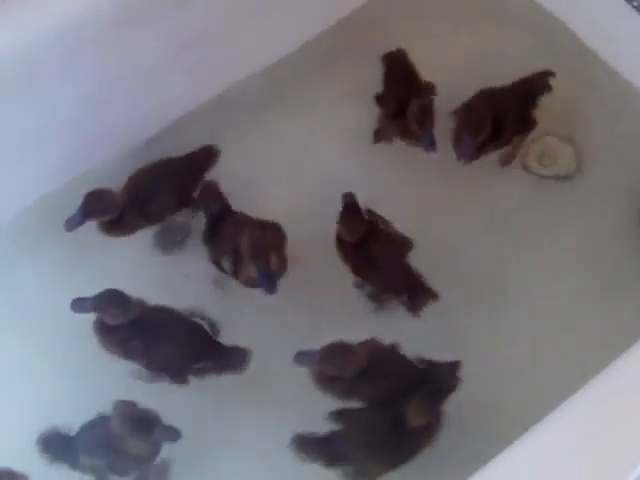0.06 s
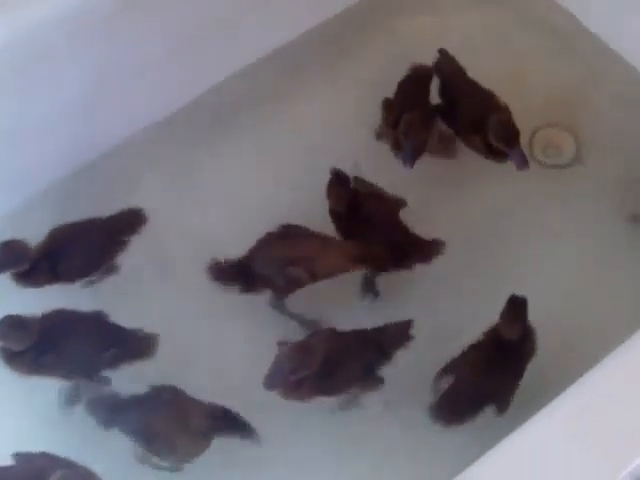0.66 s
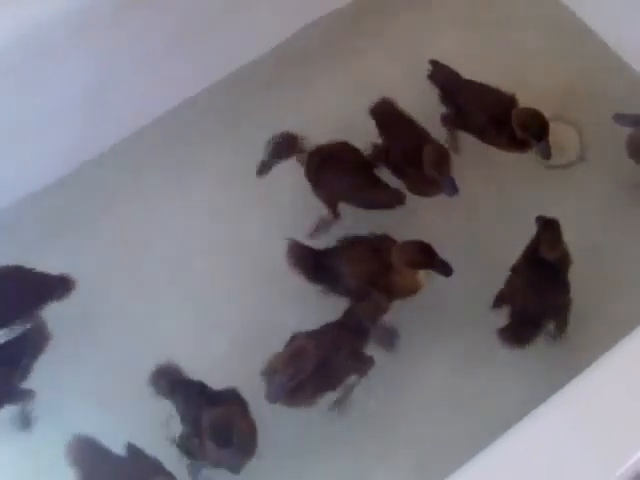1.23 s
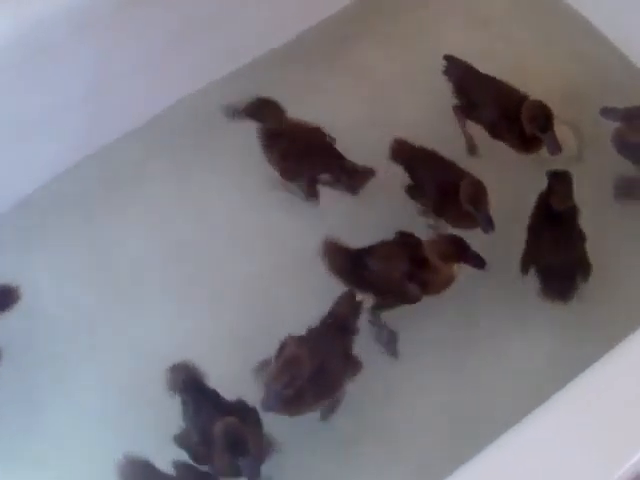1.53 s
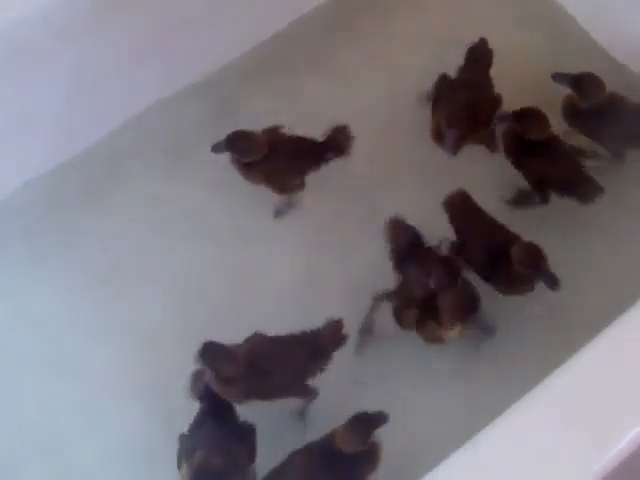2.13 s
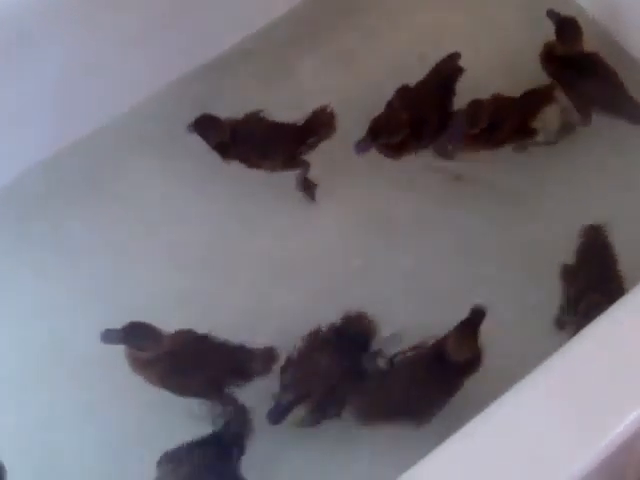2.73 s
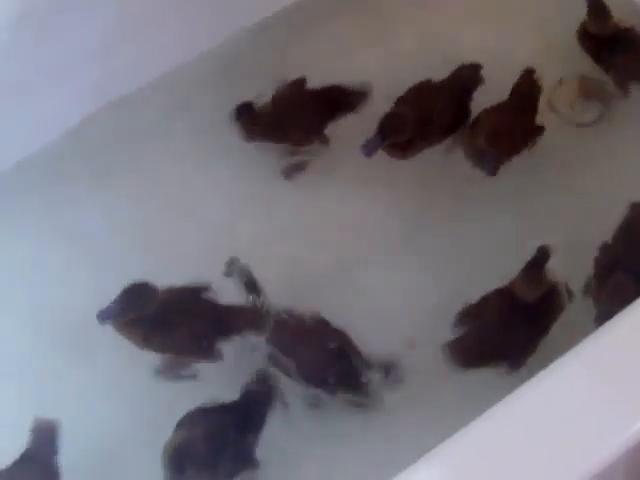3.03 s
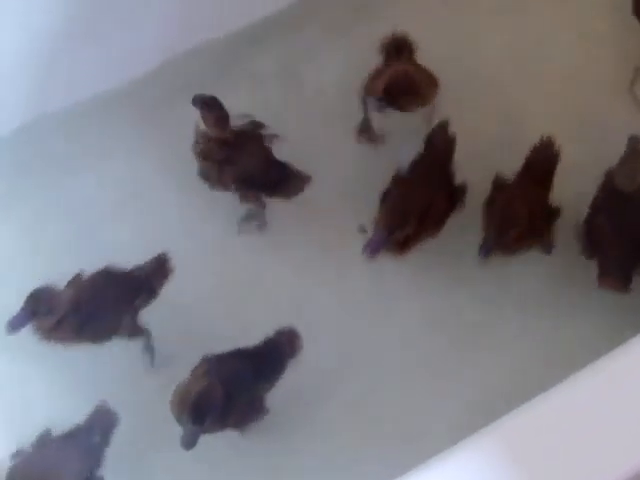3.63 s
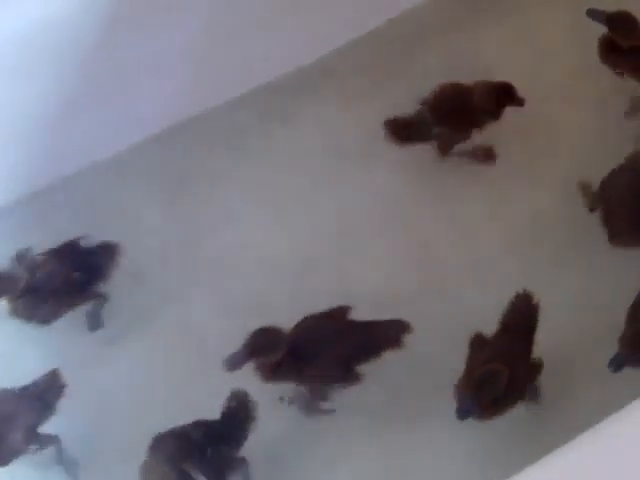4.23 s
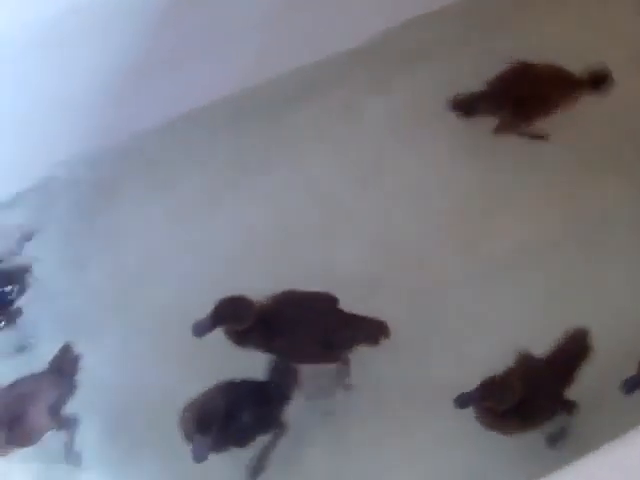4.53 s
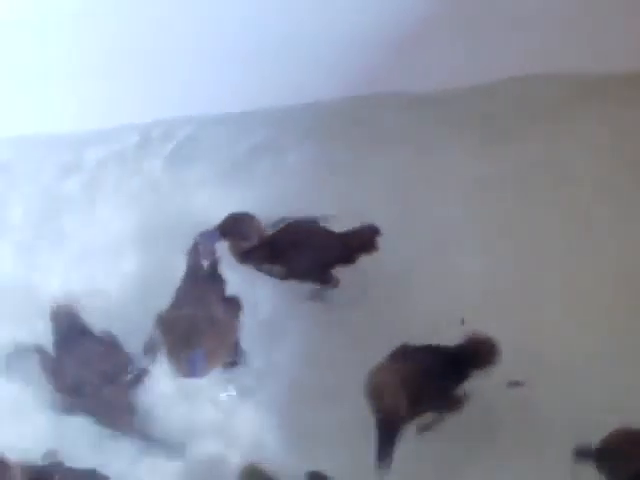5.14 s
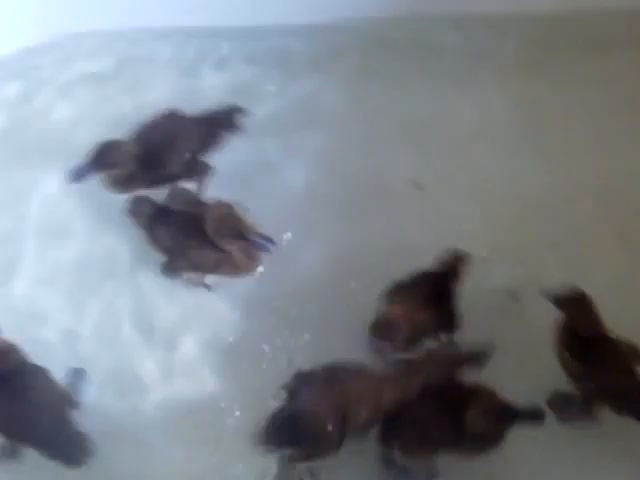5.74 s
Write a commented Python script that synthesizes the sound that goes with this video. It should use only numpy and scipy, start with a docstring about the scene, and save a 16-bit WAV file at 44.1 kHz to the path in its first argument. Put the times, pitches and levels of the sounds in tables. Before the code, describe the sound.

Ducklings peep softly while paddling in a bathtub, with small splashes and plops and one big splash at the end.

```python
"""Ducklings paddle and peep in a half-filled bathtub, heard from just above it.
A hollow gurgle dies away under the first soft peeps, whistles that arch as the bill opens and shuts.
From two to three seconds the water gets busy: feet and bills slap it, throw ticking spray and trap
bubbles that plop. More plops come near four seconds, then a run of louder peeps leads into one big
closing splash. Throughout, the surface laps and fizzes, and the hard tub and bathroom ring behind it."""
import sys
import numpy as np
from scipy import signal
from scipy.fft import rfft, irfft, next_fast_len
from scipy.io import wavfile
from scipy.ndimage import uniform_filter1d

SR = 44100
rng = np.random.default_rng(int(sys.argv[2]) if len(sys.argv) > 2 else 0)


def inscribe(sig):
    """Save sig as 16-bit PCM at rate SR to the path in sys.argv[1].

    A 1-D sig is mono; a 2-D sig holds one channel per row.
    Samples are clipped to [-1, 1] before scaling.
    """
    pcm = np.round(np.clip(np.atleast_2d(sig).T, -1, 1) * 32767)
    wavfile.write(sys.argv[1], SR, pcm.astype(np.int16))


N = 259308


def peeps(second_db=-12, third_db=-15, rasp_db=-8, jitter=0.081, arch=2.4, trim_db=-1):
    """A duckling's whistle arches in pitch as the bill opens and shuts, with a rasp on top."""
    # arched peeps (time [s], length [s], top pitch [Hz], level [dB], roughness [0-1])
    calls = [ (0.104, 0.051, 2587, -35, 0.56), (0.272, 0.051, 2475, -38, 0.42),
             (0.578, 0.04, 2300, -38, 0.5), (1.34, 0.054, 2410, -36.5, 0.39),
             (1.486, 0.045, 2730, -31, .22), (3.25, .02, 1513, -48, 0.1), (3.693, 0.045, 2502, -35, 0.3),
             (4.979, .068, 2347, -36, .14), (5.127, .061, 2809, -28, 0.23), (5.271, .052, 2514, -30, 0.48),
             (5.544, 0.048, 2525, -35, 0.7), (5.709, .06, 2980, -23.5, .4)]
    # thin sliding whistles (time [s], length [s], start pitch [Hz], end pitch [Hz], level [dB])
    whistles = [(1.86, .04, 1184, 2010, -52.5), (3.62, 0.079, 2600, 3080, -50),
                (3.846, 0.038, 3080, 2116, -36.5), (4.222, .095, 2700, 2370, -53),
                (4.395, .1, 2610, 3030, -46), (4.645, 0.044, 3190, 2050, -38)]
    # tone of the throat (frequency [Hz], gain [dB])
    throat = [(300, -60), (800, -6), (1400, 3.5), (3000, -3), (4000, -1), (5500, -11), (7200, 1),
              (8500, -1.5), (10000, -26), (14000, -16)]
    arched = [(s, length, 0.63 * hz, hz, 0.70 * hz, db, rough) for s, length, hz, db, rough in calls]
    # the thin whistles slide nearly straight and stay clean
    sliding = [(s, length, start, 1.0085 * (start + end) / 2, end, db, 0.14)
               for s, length, start, end, db in whistles]
    out = np.zeros(N)
    for s, length, start_hz, middle_hz, end_hz, db, rough in arched + sliding:
        progress = np.linspace(0, 1, int(length * SR))
        flutter = evened(uniform_filter1d(rng.standard_normal((2, SR // 4)), size=36))
        tremble, grit = flutter[:, :len(progress)]
        glide_hz = start_hz + (end_hz - start_hz) * progress
        bow_hz = (middle_hz - (start_hz + end_hz) / 2) * (1 - abs(2 * progress - 1) ** arch)
        phase = 2 * np.pi * np.cumsum((glide_hz + bow_hz) * (1 + jitter * rough * tremble)) / SR
        # overtones bloom mid-call; a hoarse call trades them for a rasp a fifth above the pitch
        overtones = gain_of(second_db) * np.sin(2 * phase) + gain_of(third_db) * np.sin(3 * phase)
        rasp = rough * gain_of(rasp_db) * grit
        edge = (1 - rough) * overtones + rasp * np.sin(1.5 * phase)
        voice = np.sin(phase) + np.sin(np.pi * progress) * edge
        effort = np.interp(progress, [0, .18, .5, .92, 1], [0, 1, .85, .9, 0]) * (1 + rasp)
        add(out, s, gain_of(db + trim_db) * topped(in_tub(effort * voice, walls_db=-4)))
    return coloured(out, throat)


def slaps(crack_db=-25, trim_db=-1):
    """Short-lived cavities in the water sound under a little crack: wide ones slap, narrow ones plink."""
    # slaps on the water and narrow, ringing bubble plinks
    # (time [s], level [dB], cavity pitch [Hz], nominal width [share of pitch], scatter [s])
    hits = [ (0.382, -41, 2150, 0.84, 0.023), (0.400, -37.5, 1660, 0.41, 0.014),
            (0.481, -43, 1300, 0.26, 0.004), (0.613, -34, 1960, 0.51, 0.0031),
            (0.776, -41, 2130, 0.21, 0.0035), (0.913, -38.5, 1340, 0.18, .025),
            (1.040, -47.5, 637, 0.53, 0.013), (1.119, -43.5, 3000, 0.25, .008),
            (1.261, -46, 2800, 0.78, 0.014), (1.330, -42.5, 970, 0.43, 0.003),
            (1.682, -43, 2680, 2.8, 0.0064), (1.762, -45, 1410, 0.18, 0.016),
            (1.959, -39.5, 2400, 0.37, 0.0025), (2.14, -40, 2630, .26, 0.014),
            (2.160, -43.5, 1320, 0.24, 0.0083), (2.203, -31.5, 2520, 0.37, 0.0044),
            (2.264, -34, 2520, 0.14, 0.0024), (2.339, -32.5, 2560, 0.6, 0.0034),
            (2.443, -29.5, 1860, 0.72, 0.013), (2.501, -30, 2710, 0.13, 0.0012),
            (2.558, -34.5, 830, 1.12, .009), (2.558, -35, 3330, 0.5, 0.0027),
            (2.647, -32.5, 2820, 0.24, 0.008), (2.695, -41, 3600, 0.15, 0.0046),
            (2.861, -31.5, 1450, 0.37, 0.015), (2.89, -32.5, 1010, 0.74, 0.034),
            (2.901, -32, 1730, 0.31, 0.014), (3.008, -32, 2525, 0.083, .006),
            (3.064, -40, 2280, 0.055, 0.0039), (3.285, -47.5, 1100, 0.39, 0.024),
            (3.535, -49, 620, 2.25, 0.069), (3.929, -42, 1830, 0.45, 0.02),
            (3.972, -33.5, 1310, 0.9, 0.017), (4.052, -39.5, 2200, 0.11, 0.0076),
            (4.34, -36.5, 3510, 0.19, 0.019), (4.409, -37.5, 2100, 0.43, 0.017),
            (4.495, -39, 1350, 0.28, 0.015), (4.772, -37.5, 2430, 1.6, 0.0055),
            (5.458, -34.5, 1340, 0.44, 0.0072), (5.814, -31, 1200, .8, 0.015),
            (5.826, -24, 1880, 1.2, 0.024), (5.842, -27.5, 816, 0.45, 0.0093),
            (5.859, -28.5, 1610, 0.22, 0.0082)]
    out = np.zeros(N)
    for s, db, hz, share, scatter_s in hits:
        hit = resonate(burst(scatter_s, first=0.14, per_s=4000), hz, share * 0.94)
        cavity = resonate(hit, hz, share * 1.9, share * 3)
        sound = in_tub(cavity + gain_of(crack_db) * hit, walls_db=-8)
        add(out, s, gain_of(db + trim_db) * topped(sound))
    return out


def spray(fizz, scatter_s=0.0033, plink_count=5, plink_db=1, trim_db=-1, lowpass_hz=12500):
    """Flung drops tick on the surface and leave a few pinhead bubbles that plink."""
    # featured drops landing (time [s], level [dB], centre [Hz], nominal width [share of centre])
    landings = [ (0.027, -43, 6200, 0.19), (0.247, -33, 5200, 0.62), (0.450, -33.5, 5120, 0.87),
                (0.523, -38, 4460, 0.27), (0.612, -35, 6800, 0.19), (0.648, -38.5, 4970, 0.41),
                (0.924, -35.5, 9500, 1), (0.958, -34.5, 10800, 0.65), (1.017, -40, 4700, 0.29),
                (1.394, -40, 10400, .9), (1.568, -40.5, 4310, 0.51), (1.622, -45, 6430, .8),
                (1.664, -41.5, 9020, .35), (2.143, -33, 7100, 0.22), (2.223, -35, 9100, 0.94),
                (2.247, -36.5, 4270, 0.34), (2.322, -31, 8460, 0.52), (2.460, -28.5, 9740, 0.26),
                (2.478, -37, 10700, 0.66), (2.569, -32.5, 7500, 0.37), (2.751, -34, 3800, 0.27),
                (2.781, -41.5, 5770, 0.23), (2.851, -35.5, 13600, 1), (2.892, -25.5, 8430, 0.86),
                (3.011, -28.5, 5670, 1), (3.015, -26.5, 4370, 0.18), (3.016, -24, 10100, 0.94),
                (3.337, -45, 5760, 0.23), (3.425, -48, 12500, 0.83), (3.871, -36, 4060, 0.99),
                (3.898, -39, 7700, .6), (4.079, -36.5, 11000, 0.79), (4.300, -43, 3920, 0.78),
                (4.341, -33.5, 5300, 0.87), (4.697, -29, 6680, 0.31), (4.768, -38, 6000, .7),
                (4.812, -40, 5860, 0.28), (5.238, -36, 11300, 0.41), (5.389, -35, 5470, 0.35),
                (5.463, -43.5, 5700, 0.67), (5.827, -25.5, 4130, 0.64)]
    out = np.zeros(N)
    for s, db, hz, share in list(landings) + stray_drops(fizz):
        tick = resonate(burst(scatter_s, first=0.11, per_s=2700), hz, share, share * 3)
        pitches = np.clip(hz * np.exp(0.64 * share * rng.standard_normal(plink_count)), 2500, 14000)
        plinks = sum(resonate(burst(scatter_s, first=0.83, per_s=810), f, 0.068, 1.0) for f in pitches)
        splash = evened(tick) + gain_of(plink_db) * evened(plinks)
        add(out, s, gain_of(db + trim_db) * topped(in_tub(splash, walls_db=-7)))
    return signal.sosfilt(signal.butter(2, lowpass_hz, fs=SR, output="sos"), out)


def stray_drops(fizz, count=50, low_hz=3570, high_hz=11600, lift_db=10, spread_db=4, share=0.506):
    """Cues for small drops at random moments and pitches, stronger while the water fizzes."""
    when, pitch, size = rng.random((count, 3)).T
    times = (np.arange(count) + when) / count * (N - 1) / SR
    levels = 20 * np.log10(fizz[(times * SR).astype(int)]) + lift_db + spread_db * (2 * size - 1)
    pitches = low_hz * (high_hz / low_hz) ** pitch
    return [(s, db, hz, share) for s, db, hz in zip(times, levels, pitches)]


def bubbles(chirp=0.19, trim_db=-1):
    """A bubble rings as it pinches off, and sharpens slightly on its way up."""
    # plops of trapped air (time [s], level [dB], pitch [Hz], attack [s], 60 dB decay [s])
    plops = [ (0.672, -35, 987, 0.001, 0.2), (0.716, -47, 3280, 0.0014, 0.045),
             (0.914, -41, 1276, 0.0016, 0.064), (0.926, -45.5, 3010, .001, 0.059),
             (1.208, -48.5, 2800, .002, .04), (1.783, -44, 5540, 0.00069, .023),
             (1.957, -43, 2080, .0006, 0.047), (2.262, -54.5, 362, 0.0058, 0.055),
             (2.567, -27.5, 686.5, 0.03, 0.041), (2.646, -36, 513, 0.0038, 0.041),
             (2.8905, -35.5, 514.6, .002, 0.14), (2.892, -33, 567, 0.0013, 0.1),
             (2.9, -34, 1020, .0037, 0.071), (3.211, -46, 3360, .001, 0.017),
             (3.257, -49, 3255, .002, 0.094), (3.901, -37, 1071, 0.0024, 0.31),
             (3.972, -26.5, 1078, 0.002, 0.074), (3.991, -32.5, 1076, .0028, 0.097),
             (4.195, -46, 1746, 0.0048, 0.058), (4.301, -40.5, 1410, 0.0011, 0.028),
             (4.754, -40.5, 977, 0.0008, 0.19), (4.769, -38, 975, 0.0049, 0.12),
             (5.812, -24, 900, 0.0026, 0.0099), (5.814, -23.5, 1657, 0.0015, 0.031),
             (5.828, -47, 546, 0.0045, .19), (5.839, -26.5, 872, 0.0023, 0.042)]
    out, t = np.zeros(N), np.arange(SR // 4) / SR
    for s, db, hz, attack_s, t60 in plops:
        envelope = (1 - np.exp(-(t / attack_s) ** 2)) * gain_of(-60 * t / t60)
        tone = np.sin(2 * np.pi * hz * t * (1 + chirp * t))
        add(out, s, gain_of(db + trim_db) * topped(envelope * tone))
    return out


def paddling(attack_s=0.0082, release_s=0.046, calm_lapping_db=-57.5, calm_fizz_db=-64.5):
    """Envelopes for lapping and fizz: each bout swells, holds and settles over the flock's bustle."""
    # bouts of paddling (time [s], length [s], lapping [dB], fizz [dB])
    strokes = [ (0.0, 0.021, -50.5, -59), (0.38, 0.16, -52.5, -54.5), (0.536, 0.13, -47.5, -55),
               (0.885, 0.16, -54.5, -54), (1.244, .13, -49, -62.5), (1.624, 0.14, -54, -58),
               (1.859, 0.096, -57, -54.5), (2.156, 0.13, -51, -54.5), (2.353, 0.18, -51, -47.5),
               (2.55, 0.2, -45.5, -54.5), (2.834, 0.074, -43.5, -54), (2.996, 0.032, -41, -41.5),
               (3.2, 0.068, -60.5, -55.5), (3.897, 0.11, -41.5, -48), (4.059, 0.053, -40, -49.5),
               (4.417, 0.076, -66, -53), (4.703, 0.17, -47, -59.5), (5.198, 0.17, -51, -56),
               (5.455, 0.23, -53, -59), (5.75, 0.15, -70, -50), (5.801, 0.023, -30, -34.5)]
    # how busy the flock keeps the surface between bouts (time [s], gain [dB])
    bustle = [(0, 2.5), (1.75, 0.5), (2.05, -2.5), (2.3, 5.5), (3.0, -3), (3.42, -4), (4.15, 1.5),
              (5.88, -1.5)]
    t = np.arange(N) / SR
    activity = gain_of(np.interp(t, *np.transpose(bustle)))
    power = np.outer(gain_of([calm_lapping_db, calm_fizz_db]), activity) ** 2
    for s, length, lapping_db, fizz_db in strokes:
        attack = np.clip((t - s) / attack_s, 0, 1)
        release = np.exp(-np.maximum(t - s - length, 0) / release_s)
        power += np.outer(gain_of([lapping_db, fizz_db]), attack * release) ** 2
    return np.sqrt(power)


def churn(lapping, fizz, lapping_db=-3, fizz_db=-2):
    """Paddling stirs up two beds of bubbles: a midrange lapping and a bright fizz."""
    # tone of each bed (frequency [Hz], gain [dB])
    lapping_eq = [(300, -41), (600, -6), (1100, 4), (2400, 3.5), (3600, -3), (6000, -28), (12000, -31)]
    fizz_eq = [(1500, -21), (3500, 1.5), (6000, 1), (8500, -0.5), (10500, 1.5), (12500, -3.5), (16000, -7)]
    low = coloured(bubble_bed(571.8, 4138, per_s=650, share=0.032, spread_db=1), lapping_eq)
    high = coloured(bubble_bed(3163, 14340, per_s=1000, share=0.031, spread_db=4), fizz_eq)
    return gain_of(lapping_db) * lapping * evened(low) + gain_of(fizz_db) * fizz * evened(high)


def bubble_bed(low_hz, high_hz, per_s, share, spread_db, sizes=28):
    """A crowd of tiny bubbles, each size swelling and ringing at its own random moments."""
    pitches = np.geomspace(low_hz, high_hz, sizes) * rng.uniform(.97, 1.03, sizes)
    pops = (resonate(patter(N, per_s / sizes, spread_db), hz, share, 4 * share) for hz in pitches)
    return sum(evened(pop) * np.sqrt(hz) for pop, hz in zip(pops, pitches))


def gurgle(start_db=-50, fade_db_per_s=18.5, body_hz=205, body_db=-21):
    """Stirred water sounds a few low, hollow resonances over a dull body, all fading steadily."""
    # hollow resonances (pitch [Hz], nominal width [Hz], gain [dB])
    modes = [(644, 9.6, 1), (677, 18, -2.5), (770, 104, -2.5), (946, 45, -8)]
    stir = rng.standard_normal(N)
    hollow = sum(gain_of(db) * resonate(stir, hz, 2 * width / hz, 2 * width / hz)
                 for hz, width, db in modes)
    body = gain_of(body_db) * evened(resonate(stir, body_hz, 0.79, 0.79))
    return (evened(hollow) + body) * gain_of(start_db - fade_db_per_s * np.arange(N) / SR)


def wash(lapping, steady_db=-63.5, slosh_db=-14, lag_s=0.45):
    """A low wash of water swells after each bout of paddling."""
    # hollow tone of the wash (frequency [Hz], gain [dB])
    wash_eq = [(100, -28), (200, -13), (400, -2.5), (600, 1), (730, 3), (950, -2), (1600, -3), (4000, -50)]
    pole = np.exp(-1 / (lag_s * SR))
    slosh = gain_of(slosh_db) * signal.lfilter([1 - pole], [1, -pole], lapping)
    return evened(coloured(rng.standard_normal(N), wash_eq)) * np.hypot(gain_of(steady_db), slosh)


def room_tone(level_db=-62):
    """The still air of the room, a faint steady hiss."""
    # tone of the air (frequency [Hz], gain [dB])
    air_eq = [(30, -27), (80, -15), (125, -11.5), (170, -6.5), (500, -10.5), (1500, -3.5), (3000, -8.5),
              (5500, -10), (10500, -10), (15500, -6.5)]
    return gain_of(level_db) * evened(coloured(rng.standard_normal(N), air_eq))


def in_tub(x, walls_db, count=12):
    """Adds quick echoes from the tub walls, which differ with every place on the water."""
    echoes = np.zeros(SR // 40)
    echoes[rng.integers(SR // 600, len(echoes), count)] = rng.choice([-1, 1], count) / np.sqrt(count)
    echoes *= gain_of(walls_db) * np.linspace(2, .5, len(echoes))
    echoes[0] = 1  # the direct sound
    return signal.fftconvolve(x, echoes)


def bathroom(x, echoes_per_s=6000, predelay_s=0.008):
    """Dense reflections make the short, bright ring of a small hard room."""
    # reverb time (frequency [Hz], 60 dB decay [s])
    decay_times = [(200, 1), (700, 0.34), (2500, 0.24), (6000, 0.23), (14000, 0.3)]
    size = SR // 2
    taps = rng.choice([-1., 1.], size) * (rng.random(size) < echoes_per_s / SR)
    taps[:int(predelay_s * SR)] = 0
    hz, t, bands = signal.stft(taps, SR, nperseg=256)
    decay = gain_of(-60 * t / read(decay_times, hz)[:, None])
    tail = signal.istft(bands * decay, SR, nperseg=256)[1]
    return signal.oaconvolve(x, tail / np.linalg.norm(tail))[:N]


def burst(scatter_s, first, per_s):
    """A dying shower of random droplet impacts, opening with a tick of strength `first`."""
    t = np.arange(SR // 5) / SR
    shower = patter(len(t), per_s, spread_db=4) * np.exp(-t / scatter_s)
    shower /= np.linalg.norm(shower) + 1e-9
    shower[0] += first
    return shower


def patter(samples, per_s, spread_db):
    """Random droplet impacts: many small, a few large."""
    chance, size, out = rng.random(samples), rng.exponential(1, samples), np.zeros(samples)
    at = np.flatnonzero(chance < per_s / SR)
    polarity = np.sign(chance[at] - .5 * per_s / SR)
    out[at] = polarity * gain_of(spread_db * np.minimum(size[at], 4))
    return out


def resonate(x, hz, *shares):
    """Resonances in series at one pitch, each width given as a share of that pitch."""
    hz = min(hz, SR / 3)
    for share in shares:
        q = max(1 / share, 3 * hz / SR)
        x = signal.lfilter(*signal.iirpeak(hz, q, SR), x + 1e-18)
    return x


def coloured(x, points):
    """Runs x through an EQ curve."""
    size = next_fast_len(N + 4096)
    gains = gain_of(read(points, np.fft.rfftfreq(size, 1 / SR)))
    return irfft(rfft(x, size) * gains, size)[:N]


def read(points, hz):
    """Reads a curve on a log-frequency axis."""
    f, value = np.transpose(points)
    return np.interp(np.log(hz + 1), np.log(f + 1), value)


def gain_of(db):
    """Decibels to amplitude."""
    return 10 ** (np.asarray(db) / 20)


def evened(x):
    """Scales to rms 1."""
    return x / np.sqrt(np.mean(x ** 2) + 1e-20)


def topped(x):
    """Scales so that the loudest few milliseconds have rms 1."""
    return x / np.sqrt(uniform_filter1d(x ** 2, size=160).max() + 1e-20)


def add(mix, s, sound):
    """Mixes a sound in at time s."""
    part = mix[max(round(s * SR), 0):][:len(sound)]
    part += sound[:len(part)]


def scene():
    """Birds and splashes, each with its reverb send, over a dry bed of gurgle, wash and room tone."""
    lapping, fizz = paddling()
    # (sound, reverb send [dB])
    sends = [(peeps(), -7), (spray(fizz), -4), (bubbles(), -9), (slaps() + churn(lapping, fizz), -5)]
    foreground = sum(x + gain_of(send_db) * bathroom(x) for x, send_db in sends)
    return (foreground + gurgle() + wash(lapping) + room_tone())[None]


def record(dry, notch_hz=7850, notch_q=22, cutoff_hz=15700):
    """A small microphone with a dip in the bass, one narrow notch and a band limit."""
    # microphone response (frequency [Hz], gain [dB])
    microphone_eq = [(30, 1), (130, -5), (260, -0.5), (500, 2), (2800, -3), (4500, -2.5), (7000, -4),
                     (10500, 0), (13000, -3), (15500, -11.5)]
    notched = signal.lfilter(*signal.iirnotch(notch_hz, notch_q, SR), coloured(dry[0], microphone_eq))
    band_limit = signal.firwin(301, cutoff_hz, window=("kaiser", 9), fs=SR)
    return signal.oaconvolve(notched, band_limit, "same")[None]


dry = scene()
out = record(dry)
inscribe(out)
```